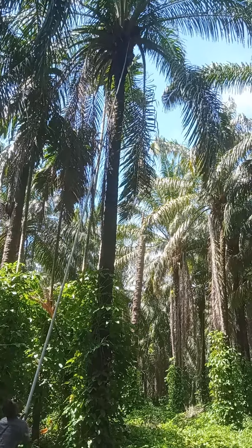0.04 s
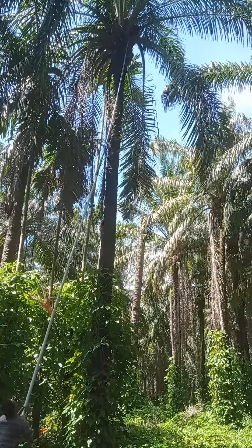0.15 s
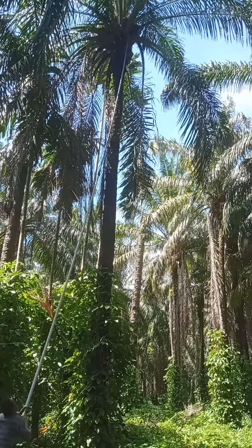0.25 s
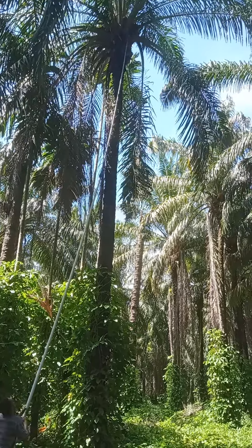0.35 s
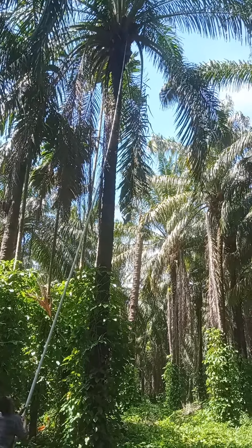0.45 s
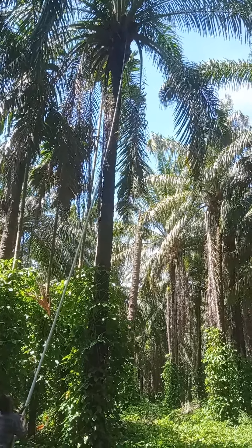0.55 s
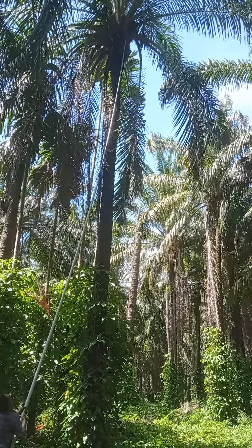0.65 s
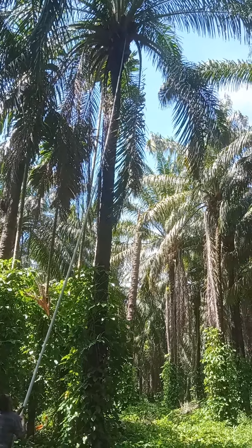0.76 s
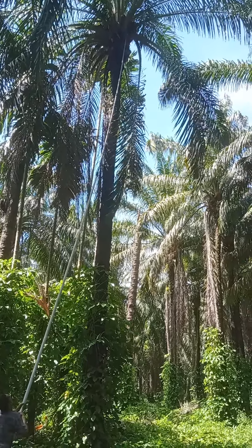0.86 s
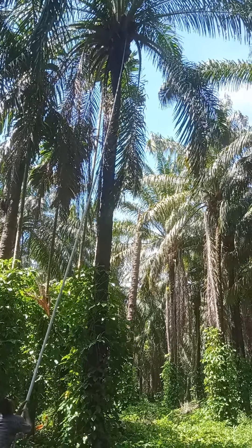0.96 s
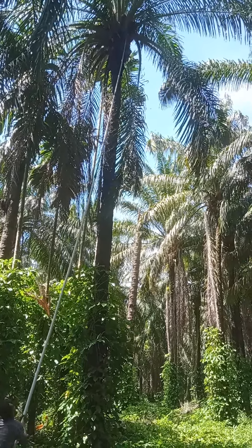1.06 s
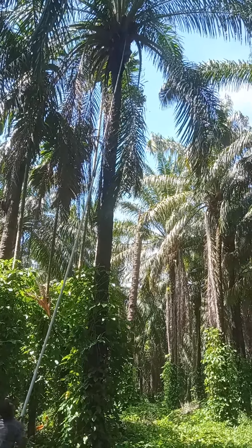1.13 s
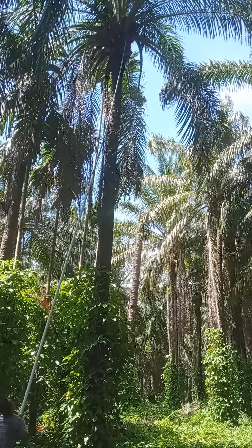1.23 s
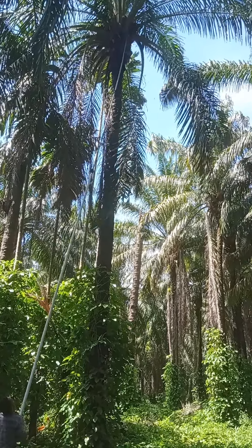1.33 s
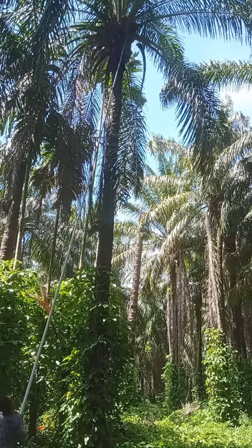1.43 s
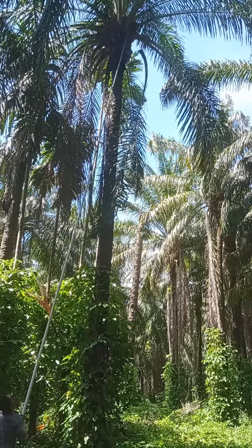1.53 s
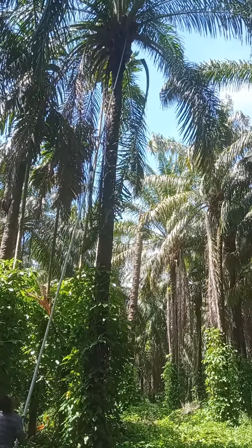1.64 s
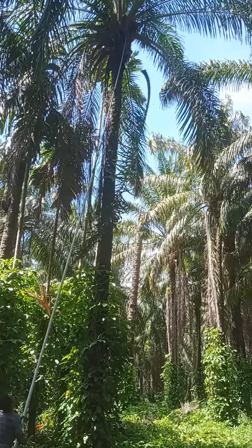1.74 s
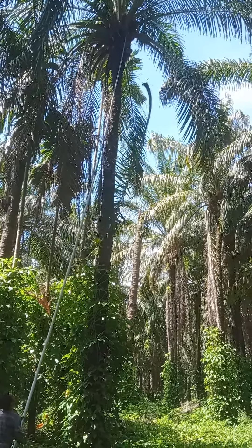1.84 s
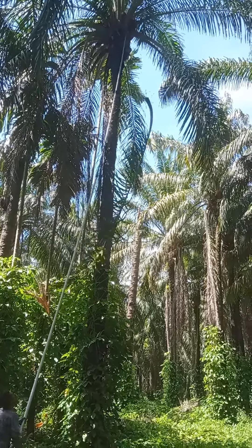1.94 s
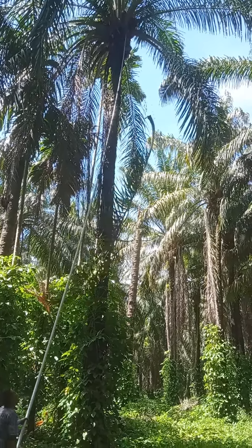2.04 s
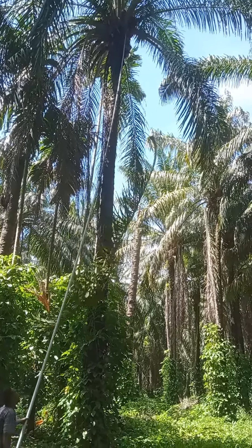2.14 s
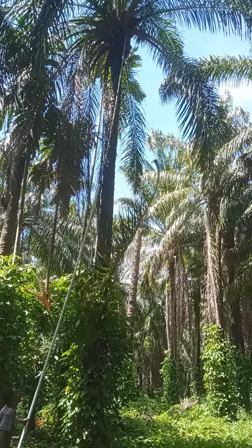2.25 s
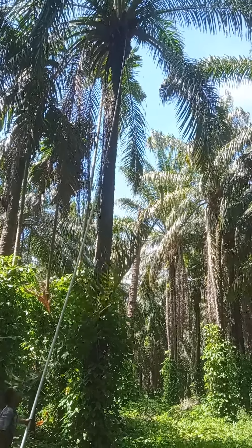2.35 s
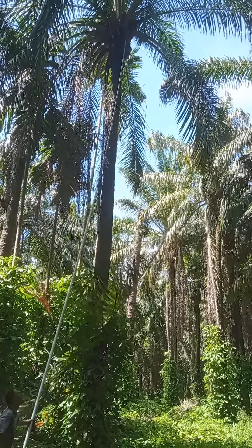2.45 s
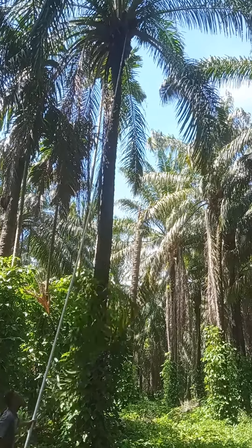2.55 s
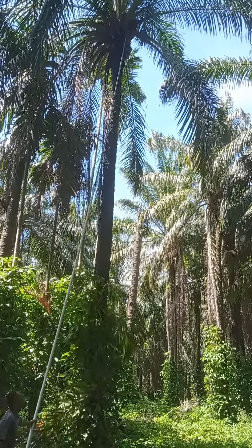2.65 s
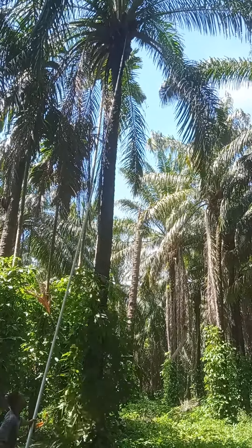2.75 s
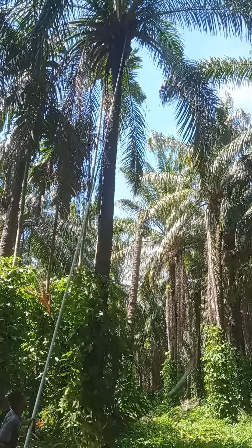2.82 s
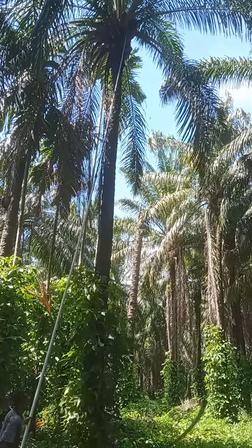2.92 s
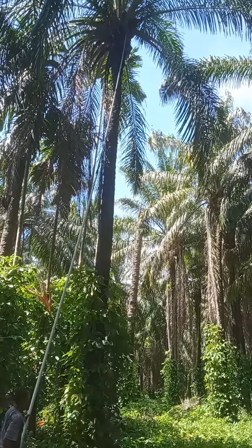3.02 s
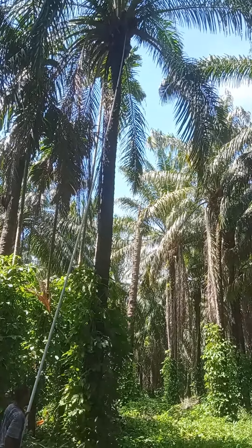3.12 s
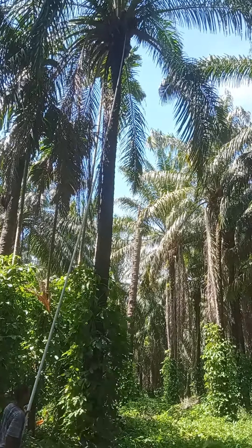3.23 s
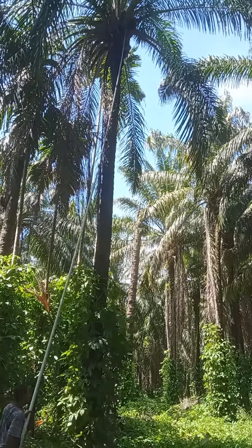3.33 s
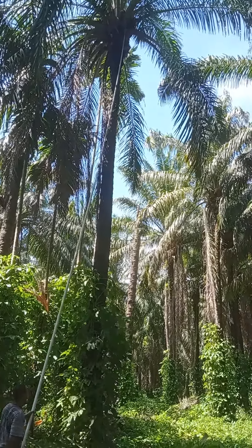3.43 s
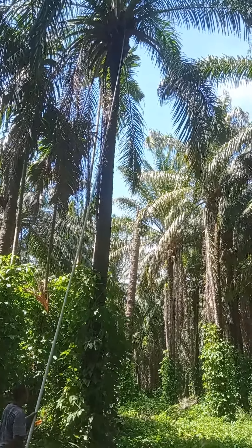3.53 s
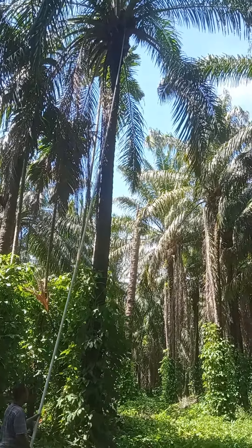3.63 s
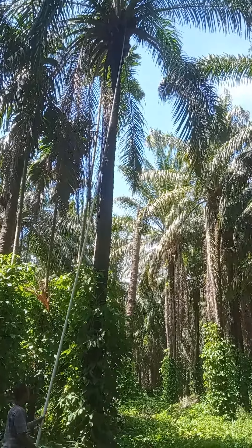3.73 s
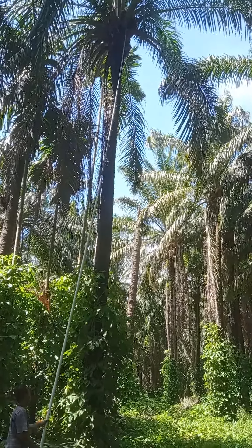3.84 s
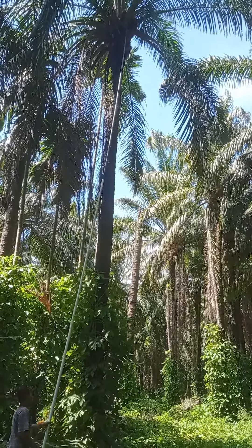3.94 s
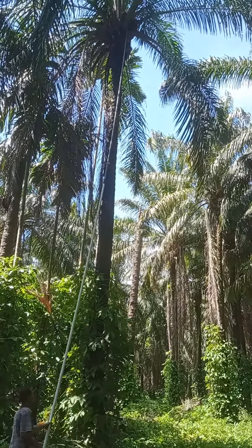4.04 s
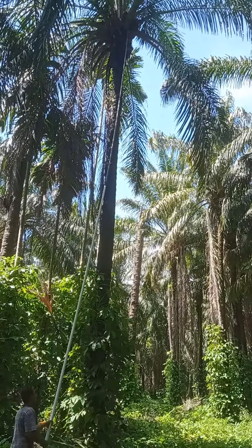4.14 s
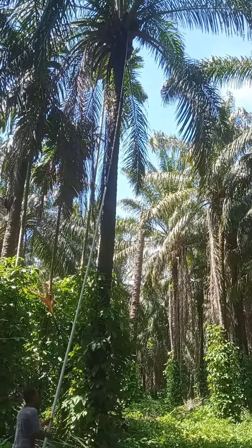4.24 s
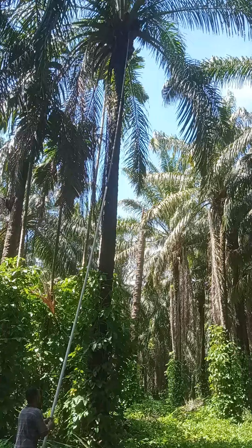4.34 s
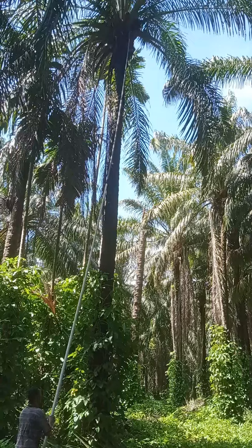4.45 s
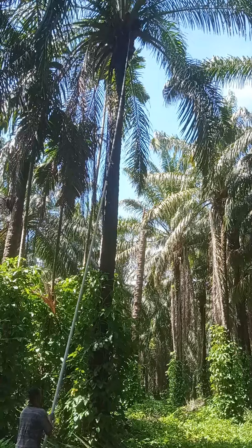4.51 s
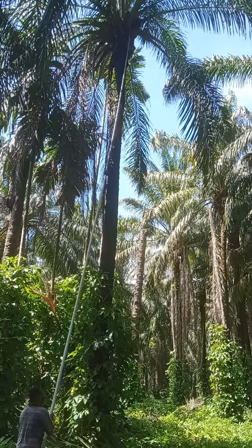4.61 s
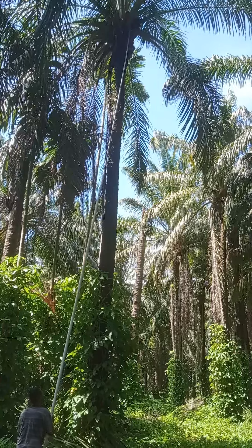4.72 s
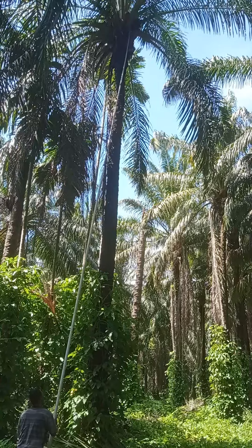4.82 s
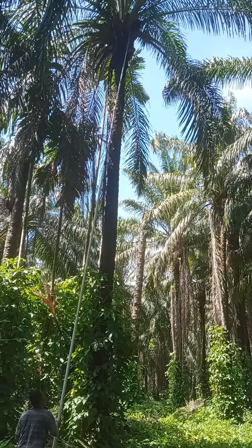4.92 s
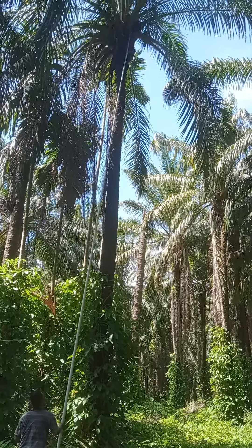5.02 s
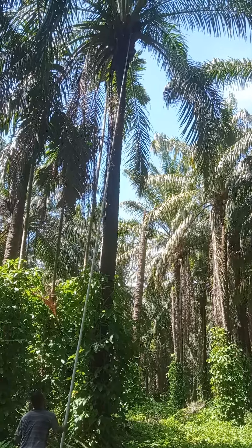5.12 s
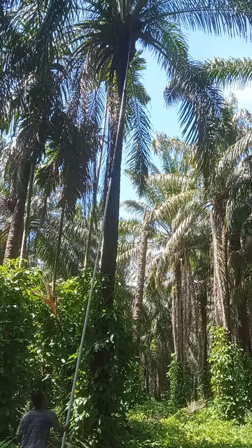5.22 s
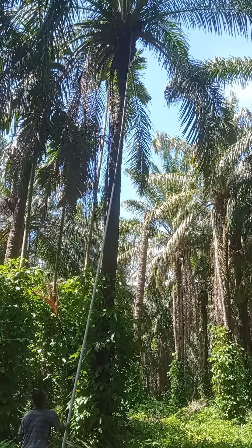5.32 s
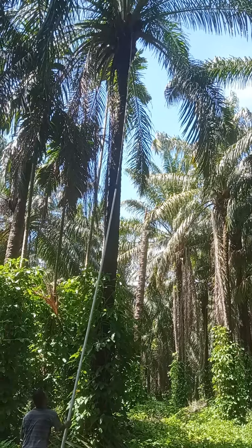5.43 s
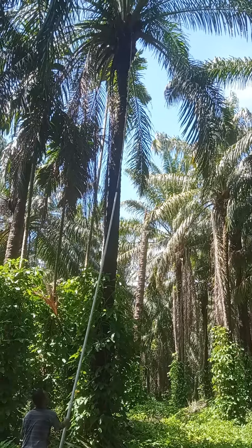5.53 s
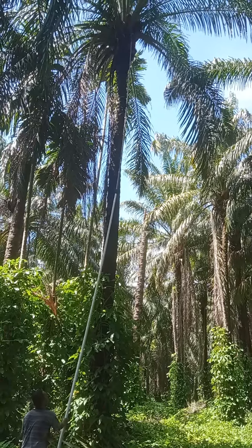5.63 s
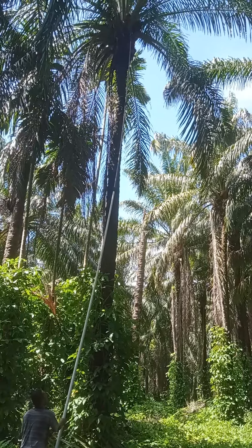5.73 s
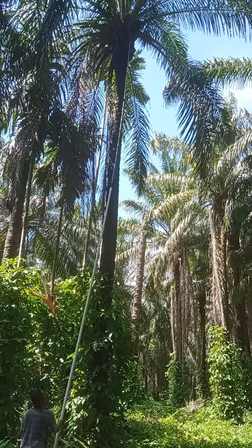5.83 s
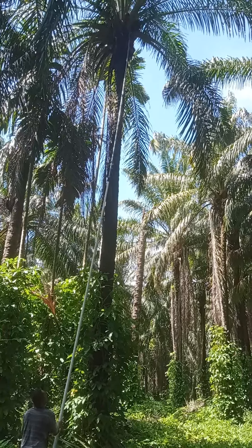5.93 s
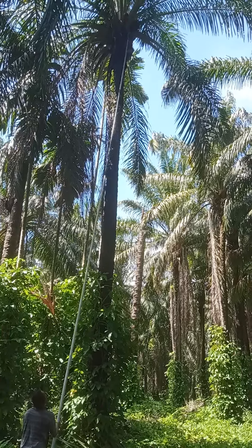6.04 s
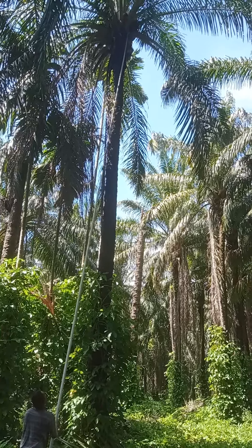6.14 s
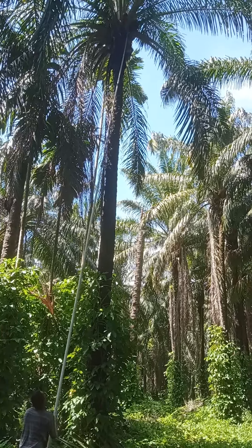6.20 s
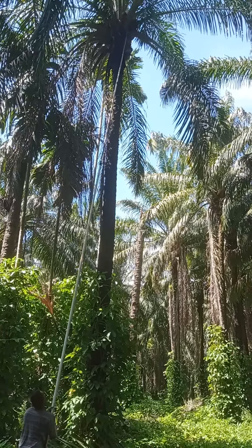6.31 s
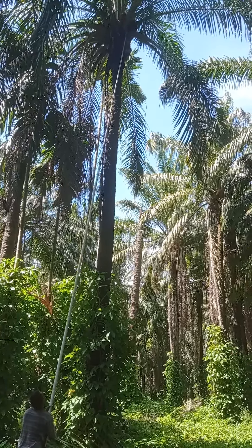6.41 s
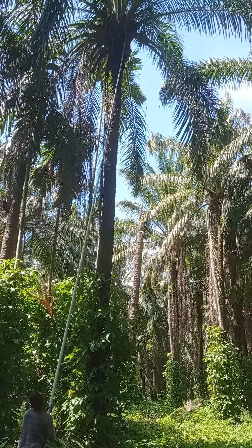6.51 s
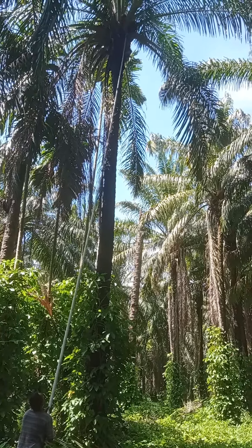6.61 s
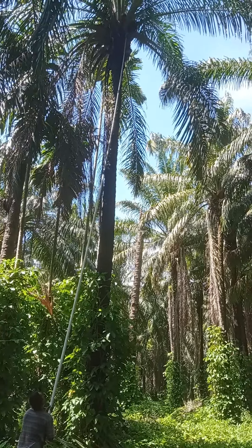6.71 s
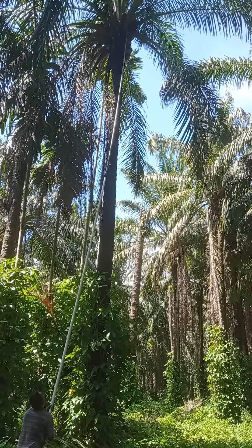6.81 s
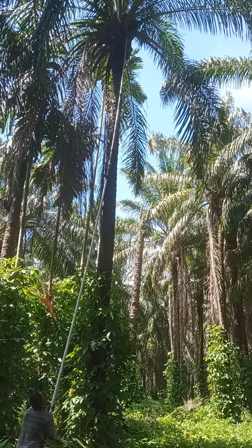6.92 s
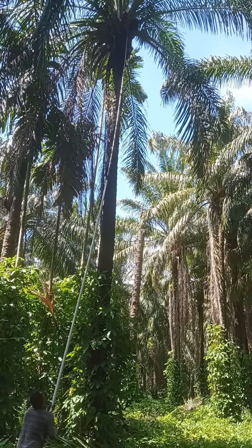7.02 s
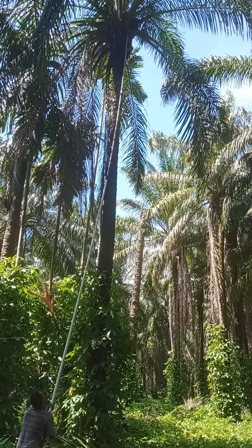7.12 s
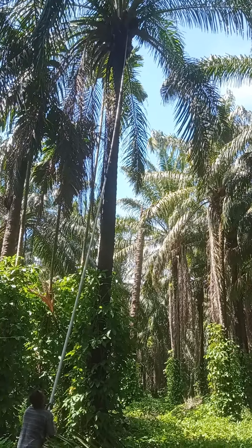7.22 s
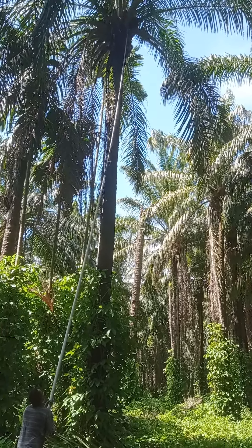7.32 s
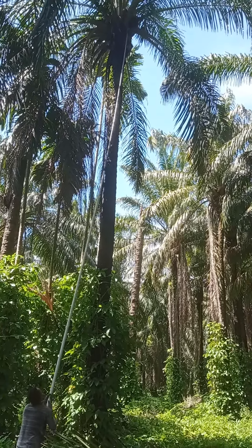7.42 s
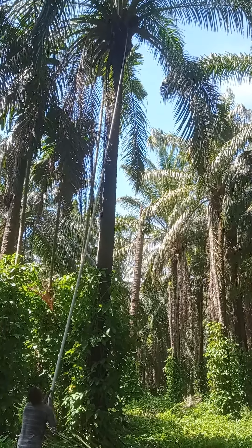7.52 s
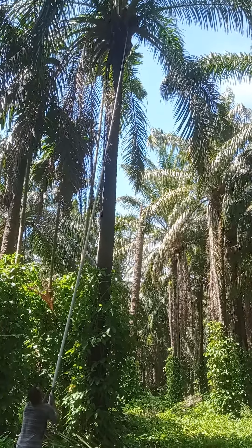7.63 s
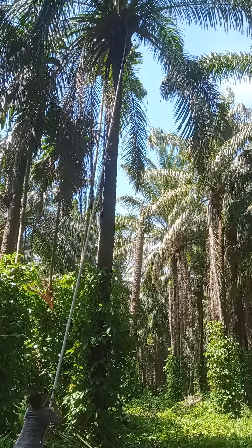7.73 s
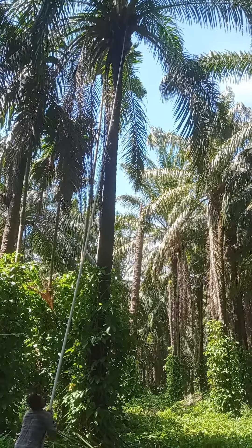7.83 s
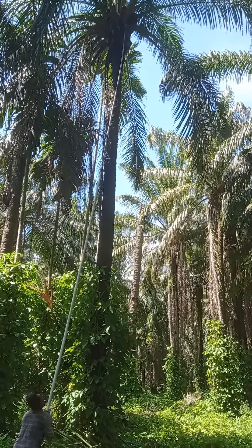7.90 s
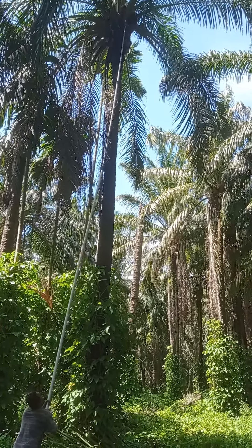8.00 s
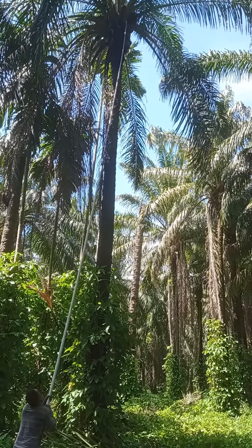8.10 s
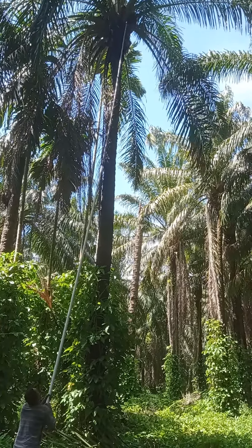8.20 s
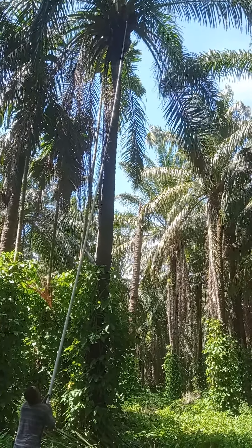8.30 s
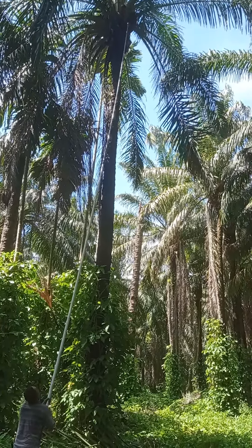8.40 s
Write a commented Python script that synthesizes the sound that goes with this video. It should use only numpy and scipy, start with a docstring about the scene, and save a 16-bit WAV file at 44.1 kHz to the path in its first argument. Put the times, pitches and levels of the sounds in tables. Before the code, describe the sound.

Sharp cracks of palm fibres being cut, a frond swishing down to a heavy thud, faint chirping, then more cracking.

```python
"""Fibres tear and snap as a sickle on a long metal pole is tugged through palm frond stalks.
The tube is dispersive, so each snap runs down it as a short falling chirp. A cut frond slides
through the leaves and its butt thuds on the soil in damped modes; the blade is then set again
and pulled. Small birds and an insect call in the grove, whose scattering returns a soft echo."""
import sys
import numpy as np
from scipy import signal
from scipy.fft import rfft, irfft, next_fast_len
from scipy.io import wavfile
from scipy.ndimage import map_coordinates

SR = 44100
rng = np.random.default_rng(int(sys.argv[2]) if len(sys.argv) > 2 else 0)


def master_out(mix):
    """Clip the mix to full scale and print it as 16-bit PCM to the path in sys.argv[1]."""
    frames = np.transpose(np.atleast_2d(mix))
    ceiling = np.clip(frames, -1, 1)
    pcm = np.round(ceiling * 32767).astype(np.int16)
    wavfile.write(sys.argv[1], SR, pcm)


N = 373086
TIME = np.arange(N) / SR


def amp(db):
    """Decibels as an amplitude ratio."""
    return 10 ** (np.asarray(db) / 20)

def unit(x):
    """Normalisation to rms 1."""
    return x / np.sqrt(np.mean(x ** 2) + 1e-20)

def along(points, hz):
    """Interpolation of (frequency, value) points on a logarithmic frequency axis."""
    f, v = np.transpose(points)
    return np.interp(np.log(hz + 1), np.log(f + 1), v)

def wobble(rate):
    """Smooth random modulation, with rate knots a second."""
    knots = rng.standard_normal(int(N * rate / SR) + 4)
    return map_coordinates(knots, [TIME * rate])

def add(track, s, sound):
    """Superposition of a sound on a track at time s."""
    part = track[max(round(s * SR), 0):][:len(sound)]
    part += sound[:len(part)]

def filtered(x, response):
    """Linear filtering: the spectrum of x times a frequency response."""
    size = next_fast_len(N + SR // 2, True)
    return irfft(rfft(x, size) * response(np.fft.rfftfreq(size, 1 / SR)), size)[:N]

def coloured(x, spectrum):
    """Spectral shaping of x, at rms 1."""
    return unit(filtered(x, lambda hz: amp(along(spectrum, hz))))

def resonant(x, centre_hz, half_width_hz):
    """Resonance: one narrow band of x, at rms 1."""
    return unit(filtered(x, lambda hz: 1 / (1 + ((hz - centre_hz) / half_width_hz) ** 2)))

def crackle(rate, spread_db):
    """Shot noise: random impulses of uneven size, rate a second, at rms 1."""
    sizes = rng.standard_normal(N) * amp(spread_db * np.minimum(rng.standard_normal(N), 2))
    return unit(sizes * (rng.random(N) < rate / SR))

def arches(rows):
    """Half-sine amplitude envelopes for (time, duration, level) rows."""
    envelope = np.zeros(N)
    for s, length, db in rows:
        add(envelope, s, amp(db) * np.sin(np.linspace(0, np.pi, int(length * SR))))
    return envelope

def swell(rows, build_db_per_s=540, ease_db_per_s=121):
    """Exponential growth and decay around (time, hold, level) plateaus, summed in power."""
    power = np.zeros(N)
    for s, hold, db in rows:
        before, after = np.clip(s - TIME, 0, 1), np.clip(TIME - s - hold, 0, None)
        power += amp(db - build_db_per_s * before - ease_db_per_s * after) ** 2
    return np.sqrt(power)


# still air: (frequency [Hz], relative level [dB])
AIR_SPECTRUM = [(15, -43), (25, -7), (82, 4), (253, -5), (666, -7), (1300, -16.5), (3170, -8), (4620, -17),
                (5280, -24), (6050, -32.5), (6730, -20.5), (7500, -27), (9300, -19.5), (12200, -36.5),
                (15500, -37.5)]

def air():
    """Ambient noise: a faint broadband floor whose level drifts slightly."""
    return amp(-67.5) * coloured(rng.standard_normal(N), AIR_SPECTRUM) * amp(0.38 * wobble(3.3))


# decay of the echo: (frequency [Hz], reverberation time [s])
GROVE_T60 = [(80, 1.85), (200, 0.08), (3200, 1.36), (9000, 1.4)]
# colour of the echo: (frequency [Hz], gain [dB])
GROVE_GAIN = [(90, 5.5), (300, -2.5), (1000, -5.5), (2200, -6), (3200, 8), (4800, -6.5), (12000, 1)]

def grove(x, build_s=0.0067, segments=34):
    """Reverberation: trunks and swaying crowns scatter each moment into a soft tail of its own."""
    echo, hop = np.zeros(N), N // segments + 1
    for start in range(0, N, hop):
        hz, t, noise = signal.stft(rng.standard_normal(SR), SR, nperseg=256)
        envelope = amp(-60 * t / along(GROVE_T60, hz)[:, None]) * (1 - np.exp(-t / build_s))
        tail = signal.istft(noise * envelope, SR, nperseg=256)[1]
        add(echo, start / SR, signal.fftconvolve(x[start:start + hop], tail / np.linalg.norm(tail)))
    return filtered(echo, lambda hz: amp(along(GROVE_GAIN, hz)))


# the insect's phrases: (start [s], end [s], level [dB])
INSECT_PHRASES = [(0.58, 1.166, -75.5), (4.638, 5.2, -82), (5.522, 6.1, -83), (6.423, 7.05, -81.5),
                  (7.304, 7.848, -81.5)]

def insect():
    """Amplitude modulation of narrow-band noise: a thin buzz that swells in phrases."""
    envelope = arches((start, end - start, db) for start, end, db in INSECT_PHRASES)
    envelope *= amp(1.6 * wobble(40))
    return envelope * resonant(rng.standard_normal(N), centre_hz=7060, half_width_hz=70)


def whistle(length, start_hz, end_hz, curve=1):
    """Frequency glide of a pure tone; a curve over 1 lingers on the first pitch."""
    progress = np.linspace(0, 1, int(length * SR))
    hz = start_hz + (end_hz - start_hz) * progress ** curve
    return np.sin(np.pi * progress) * np.sin(2 * np.pi * np.cumsum(hz) / SR)


# one bird's notes: (time [s], duration [s], start pitch [Hz], end pitch [Hz], relative level [dB])
BIRD_SLURS = [(5.618, 0.02, 3900, 3230, -61.5), (5.849, 0.073, 3050, 4410, -56),
              (6.657, 0.031, 4300, 3200, -54), (6.888, 0.057, 3050, 4450, -54),
              (7.678, 0.0224, 4000, 3200, -54.5)]

def slurring_bird():
    """Frequency and amplitude modulation: single gliding notes with a quivering level."""
    song = np.zeros(N)
    for s, length, start_hz, end_hz, db in BIRD_SLURS:
        add(song, s, amp(db) * whistle(length, start_hz, end_hz))
    return song * amp(2.3 * wobble(150))


# a second bird's phrases: (start [s], end [s], relative level [dB])
BIRD_TWITTERS = [(0.697, 1.12, -54.5), (4.016, 4.712, -58.5), (5.061, 5.158, -63), (5.314, 5.969, -59.5),
                 (6.478, 7.168, -59), (7.434, 7.89, -57.5)]

def twittering_bird(high_hz=4810, low_hz=4250, period_s=.047, gap_s=.015):
    """A pulse train: quick pairs of falling pips, whose pitch climbs as the phrase gets going."""
    song = np.zeros(N)
    for start, end, db in BIRD_TWITTERS:
        for s in np.arange(start, end, period_s):
            pitch = 1 - 0.051 * np.exp(-(s - start) / 0.16) + rng.normal(0, .005)
            pip = whistle(0.0132, high_hz * pitch, low_hz * pitch, curve=3)
            for lag in (0, gap_s):
                add(song, s + lag + rng.normal(0, 0.0014), amp(db + rng.normal(0, 0.55)) * pip)
    return song


# the frond sags, plunges through the leaves and comes to rest: (time [s], relative level [dB])
FROND_FALL = [(1.6, -45), (1.7, -47.5), (1.85, -43), (1.92, -46.5), (2.81, -31.5), (3.23, -33.5),
              (3.29, -42.5), (3.59, -53), (4.5, -67)]
# leaves spring back: (time [s], hold [s], relative level [dB])
LEAF_REBOUNDS = [(4.61, 0.033, -56), (4.73, 0.0148, -58)]
# rustling leaflets: (frequency [Hz], relative level [dB])
LEAF_SPECTRUM = [(180, -41.5), (300, -8.5), (435, -9.5), (527, -7), (713, -3.5), (913, -8.5), (1250, -6.5),
                 (1420, -7.5), (2030, -1), (2360, -4.5), (3060, 1), (4030, -3), (5300, -18), (8000, -23.5),
                 (10400, -56), (17600, -120)]
# hiss of leaf edges and splinters: (frequency [Hz], relative level [dB])
HISS_SPECTRUM = [(3000, -36), (5500, -1.5), (7200, -5.5), (9300, 5), (12500, -9.5), (15500, -10.5)]
# swish of the heavy rib: (frequency [Hz], relative level [dB])
RIB_SPECTRUM = [(25, -45.5), (50, -19), (85, -5.5), (160, -1.5), (280, -1), (450, -15.5), (900, -40)]

def falling_frond(fade_db_per_s=55.5, sink_s=3.32, sink_spread_s=.42, sink_db=20):
    """Friction noise: leaflets brush past each other in dense grains; the rib tumbles below them."""
    s, db = np.transpose(FROND_FALL)
    outside_fall_s = np.abs(TIME - np.clip(TIME, s[0], s[-1]))
    falling = amp(np.interp(TIME, s, db) - fade_db_per_s * outside_fall_s)
    rustle = np.hypot(falling, swell(LEAF_REBOUNDS))
    hiss = rustle.max() * (rustle / rustle.max()) ** 0.98
    # the rib is heard most as it sinks into the undergrowth
    swish = rustle * amp(sink_db * np.exp(-np.abs(TIME - sink_s) / sink_spread_s))
    leaves = amp(2) * rustle * coloured(crackle(rate=14000, spread_db=0.5), LEAF_SPECTRUM)
    edges = amp(-11) * hiss * coloured(crackle(rate=17000, spread_db=-2), HISS_SPECTRUM)
    rib = amp(-19 + 2 * wobble(36)) * swish * coloured(rng.standard_normal(N), RIB_SPECTRUM)
    flutter = amp(0.93 * wobble(35))
    return flutter * (leaves + edges) + rib


# dry leaflets flick: (time [s], relative spit level [dB], relative tick level [dB])
LEAF_FLICKS = [(1.8327, -43.5, -56), (3.0549, -39.5, -28.5), (4.5685, -55, -52.5), (4.6174, -47.5, -39),
               (6.643, -44, -55), (7.6242, -48, -44), (7.6314, -35, -54), (7.8053, -53, -55)]

def flicks(t60=0.048):
    """Exponentially decaying transients: each dry leaflet gives a bright spit and a lower tick."""
    spit, tick = np.zeros((2, N))
    decay = amp(-60 * TIME[:SR // 5] / t60)
    for s, spit_db, tick_db in LEAF_FLICKS:
        add(spit, s, amp(spit_db - 12) * decay)
        add(tick, s, amp(tick_db - 7) * decay)
    noise = rng.standard_normal(N)
    spit_spectrum = [(3000, -16), (6000, -10), (9500, 4.5), (12000, -7), (15000, -11)]
    return spit * coloured(noise, spit_spectrum) + tick * coloured(noise, LEAF_SPECTRUM)


# the butt glances off the trunk, lands and settles: (time [s], peak level [dB], hardness [dB/octave])
BUTT_IMPACTS = [(3.052, -22.5, 7), (3.15, -1, -4), (3.178, -17.5, 7.5), (3.221, -25.5, -1.5),
                (3.257, -25.5, -14)]
# the butt on soil: (frequency [Hz], relative level [dB], 60 dB decay time [s])
BUTT_MODES = [(160, -9.5, 0.018), (285, -2, 0.029), (620, -8.5, 0.039), (710, -12.5, 0.029),
              (1674, -15, 0.052)]

def thuds(attack_s=0.0016, lag_s_per_octave=.001):
    """Modal damping: the butt hits soft soil and its modes die quickly, the higher ones waking later."""
    landing, t = np.zeros(N), TIME[:SR // 5]
    attack = 1 - np.exp(-(t / attack_s) ** 2)
    for s, db, hardness in BUTT_IMPACTS:
        ring = np.zeros(len(t))
        for hz, mode_db, t60 in BUTT_MODES:
            struck_db = mode_db + hardness * np.log2(min(hz, 700) / 300)
            mode = amp(struck_db - 60 * t / t60) * np.sin(2 * np.pi * hz * t) * attack
            add(ring, lag_s_per_octave * np.log2(hz / BUTT_MODES[0][0]), mode)
        add(landing, s, amp(db) * ring / np.abs(ring).max())
    return landing


# the stalk groans softly against the blade: (time [s], duration [s], level [dB])
STALK_RUBS = [(0.393, 0.032, -30), (0.975, 0.093, -54.5), (1.148, 0.07, -41), (4.233, 0.093, -65),
              (4.896, 0.051, -51), (5.343, 0.041, -49), (7.136, 0.069, -64), (7.347, 0.036, -62.5),
              (7.439, 0.16, -58), (7.597, 0.027, -51.5)]

def rubs():
    """Frictional excitation: slow slipping wakes only the stalk's lowest resonance."""
    slips = crackle(rate=1300, spread_db=4.5)
    return arches(STALK_RUBS) * resonant(slips, centre_hz=620, half_width_hz=110)


# peaks and dips of stalk and pole: (frequency [Hz], width [Hz], gain [dB])
STALK_RESONANCES = [(703.6, 230, 9), (859, 69, -11.5), (1053, 200, 10), (1175, 130, -6), (2026, 230, 5.5),
                    (2850, 190, 5.5), (3060, 140, 3.5)]

def stalk(spectrum, phase_lag=lambda hz: 0, size=4096):
    """Impulse response of the resonances on a spectrum, with the phase lag of a travelling wave."""
    hz = np.fft.rfftfreq(size, 1 / SR)
    lift_db = sum(db / (1 + (2 * (hz - centre) / width) ** 2) for centre, width, db in STALK_RESONANCES)
    magnitude = amp(along(spectrum, hz) + lift_db)
    cepstrum = irfft(np.log(magnitude))[:size // 2]  # one-sided, so the ring is causal
    ring = irfft(np.exp(2 * rfft(cepstrum, size) - 1j * phase_lag(hz)))[:size // 2]
    return ring / np.abs(ring).max()


# the bending wave's knock: (frequency [Hz], relative level [dB])
BENDING_SPECTRUM = [(40, -51), (150, -17.5), (300, -15), (550, -5), (1000, -2.5), (1800, 1.5), (2400, -8.5),
                    (3200, -25), (5000, -65.5)]
# the ovalling wave's zing: (frequency [Hz], relative level [dB])
OVALLING_SPECTRUM = [(2500, -1.5), (3200, -3.5), (4100, 0), (5000, -12.5), (7000, -27.5), (9500, -27.5),
                     (15000, -54.5)]

def pole(bend_s=0.003003, oval_s=.0035, cutoff_hz=2980):
    """Dispersion gives two falling chirps: bending, and ovalling that slows towards its cut-off."""
    # travel times: bend_s at 1 kHz, oval_s far above the cut-off
    bending = stalk(BENDING_SPECTRUM, lambda hz: 4 * np.pi * bend_s * np.sqrt(hz * 1000))
    ovalling = stalk(OVALLING_SPECTRUM,
                     lambda hz: 2 * np.pi * oval_s * np.conj(np.sqrt(hz ** 2 - cutoff_hz ** 2 + 0j)))
    # each wave starts just before its arrival, with soft ends
    waves = bending[round(bend_s * SR / 2):], ovalling[round(oval_s * SR * .8):]
    return [wave * signal.windows.tukey(len(wave), .025) for wave in waves]


# tugs on the pole: (time of full force [s], hold [s], level [dB])
POLE_TUGS = [(0.0, 0.0089, -44), (0.113, 0.086, -25.5), (0.35, 0.057, -39.5), (1.213, 0.061, -24.5),
             (1.39, 0.026, -37.5), (7.52, 0.0072, -50.5), (7.81, 0.03, -58.5), (7.935, 0.023, -31),
             (7.985, 0.02, -19.5), (8.255, 0.013, -30.5), (8.37, 0.013, -39)]
# tearing fibres: (frequency [Hz], relative level [dB])
FIBRE_SPECTRUM = [(40, -44.5), (130, -22.5), (250, -14), (400, -6), (560, -3.5), (1000, -6), (1900, -7.5),
                  (3000, -11), (4000, -10.5), (5200, -16.5), (7000, -37), (15000, -58.5)]
# low flutter of the loaded stalk: (frequency [Hz], relative level [dB])
FLUTTER_SPECTRUM = [(30, -30.5), (120, -6.5), (250, 0), (450, -4.5), (900, -29.5)]

def tearing(bend_lead_s=.03, splinter_lag_s=.006, judder_db=3):
    """Progressive fracture: the stalk bends, the blade judders through its fibres and splinters fly."""
    # strained fibres go on crackling faintly after each tug
    strain = amp(-16) * swell(POLE_TUGS, build_db_per_s=340, ease_db_per_s=30)
    tear = np.hypot(swell(POLE_TUGS), strain)
    spray = amp(-18) * np.interp(TIME - splinter_lag_s, TIME, tear)
    bend = amp(-21) * np.interp(TIME + bend_lead_s, TIME, tear)
    fractures = crackle(rate=2000, spread_db=0.5)
    _, ovalling = pole()
    stalk_ring = unit(signal.fftconvolve(fractures, stalk(FIBRE_SPECTRUM))[:N])
    pole_ring = amp(-15) * unit(signal.fftconvolve(fractures, ovalling)[:N])
    splinters = coloured(crackle(rate=14000, spread_db=0), HISS_SPECTRUM)
    flutter = coloured(rng.standard_normal(N), FLUTTER_SPECTRUM)
    judder = amp(judder_db * np.tanh(wobble(70)))
    return judder * (tear * (stalk_ring + pole_ring) + spray * splinters + bend * flutter)


# the blade snaps fibres or knocks on the stalk: (time [s], knock level [dB], zing level [dB])
FIBRE_SNAPS = [(0.0, -26, -37), (0.073, -17.5, -32.5), (0.118, -9.5, -16), (0.127, -5.5, -13.5),
               (0.159, -4, -11), (0.169, -11, -20), (0.196, -11.5, -18.5), (0.238, -6.5, -21),
               (0.244, -13, -19), (0.367, -22.5, -50), (0.403, -22, -61), (0.464, -23.5, -75),
               (0.582, -20, -33), (0.644, -22, -36.5), (0.67, -19.5, -36), (1.19, -13.5, -27.5),
               (1.207, -13, -31), (1.219, -10, -24), (1.258, -10, -23), (1.264, -9, -25),
               (1.272, -10.5, -21), (1.307, -11.5, -24), (1.37, -15, -22), (1.38, -12.5, -27),
               (1.428, -25.5, -38), (1.456, -20.5, -38), (1.495, -14.5, -25.5), (1.547, -12, -23.5),
               (4.045, -44, -59), (4.837, -21, -31), (5.349, -37, -49.5), (5.981, -48.5, -57.5),
               (6.212, -51.5, -75.5), (6.688, -22, -34), (7.908, -25.5, -37.5), (7.969, -11, -22),
               (7.98, -5, -11.5), (8.005, -13, -23), (8.026, -5.5, -16), (8.071, -2, -16),
               (8.172, -8, -21.5), (8.264, -13, -27.5), (8.336, -11.5, -22), (8.409, -19.5, -32.5),
               (8.449, -22, -42)]

def snaps(joint_s=0.00334, joint_reflection=0.12, rattle_db=-3, rattle_t60=0.12):
    """Impulse excitation: a sharp push and a rattle drive both waves; a joint reflects the knock."""
    knocks, zings = np.zeros((2, N))
    t = TIME[:SR // 5]
    for s, knock_db, zing_db in FIBRE_SNAPS:
        rattle = rng.standard_normal(len(t)) * amp(-60 * t / rattle_t60) * (1 - np.exp(-t / 0.0007))
        push = amp(rattle_db) * rattle / np.linalg.norm(rattle)
        push[0] += 1
        # sub-millisecond jitter keeps the snaps from ringing together at multiples of 1 kHz
        s += rng.uniform(-.0005, .0005)
        add(zings, s, amp(zing_db) * push)
        push[round(joint_s * SR * rng.uniform(.85, 1.15))] += joint_reflection
        add(knocks, s, amp(knock_db) * push)
    bending, ovalling = pole()
    return signal.fftconvolve(knocks, bending)[:N] + signal.fftconvolve(zings, ovalling)[:N]


def scene():
    """Superposition of the work at the palm, the wildlife, their echo and the still air."""
    cutting = snaps() + tearing() + rubs() + flicks()
    landing = thuds()
    slurs, twitter = slurring_bird(), twittering_bird()
    echo = grove(amp(-9.5) * cutting + amp(-10.5) * landing + amp(-8.5) * slurs + amp(-1) * twitter)
    birds = amp(2.5) * slurs + amp(-4.5) * twitter
    return (air() + echo + birds + falling_frond() + insect() + landing + cutting)[None]

def record(dry, bass_hz=55, top_hz=15650):
    """Band limiting: the small microphone loses the deep bass, and nothing passes above top_hz."""
    sound = signal.sosfilt(signal.butter(2, bass_hz, "highpass", fs=SR, output="sos"), dry[0])
    return filtered(sound, lambda hz: hz < top_hz)[None]


dry = scene()
out = record(dry)
master_out(out)
```